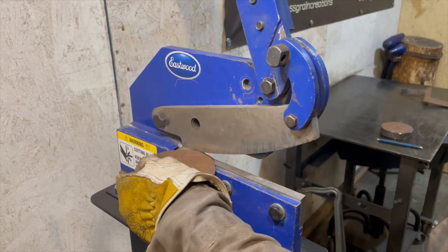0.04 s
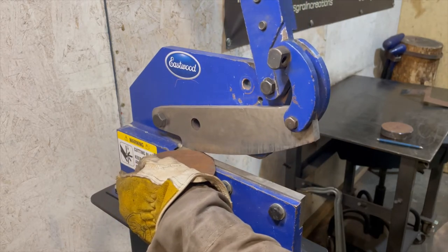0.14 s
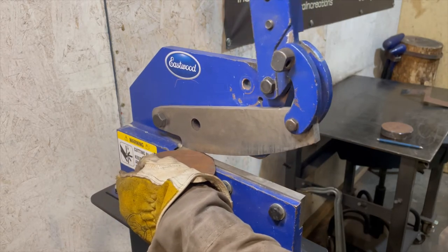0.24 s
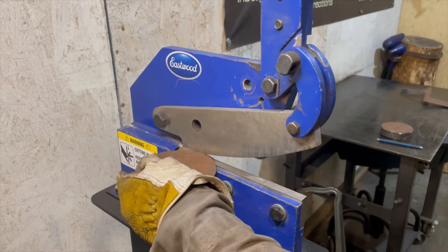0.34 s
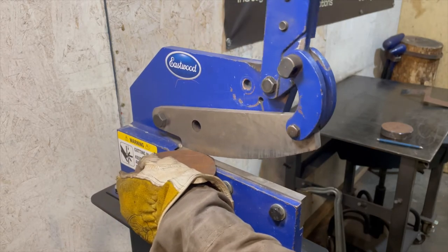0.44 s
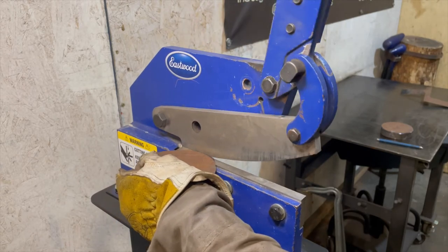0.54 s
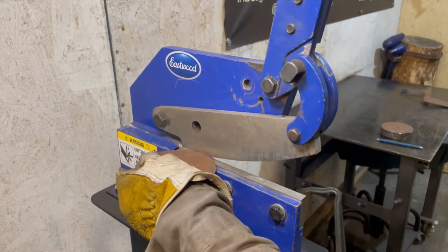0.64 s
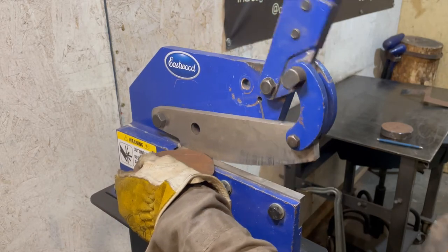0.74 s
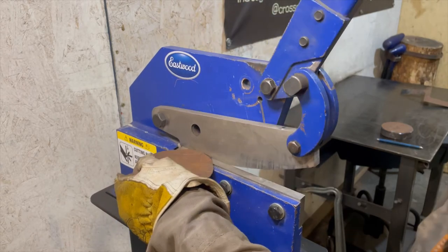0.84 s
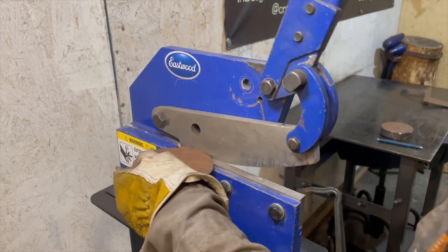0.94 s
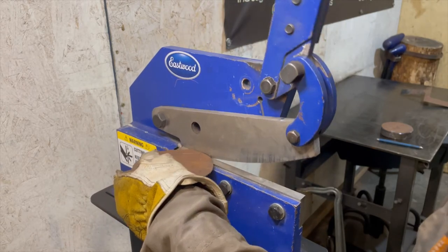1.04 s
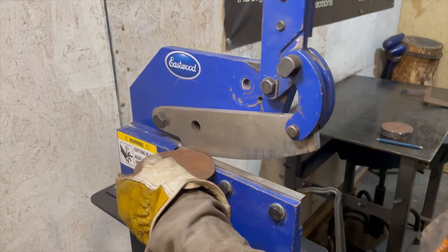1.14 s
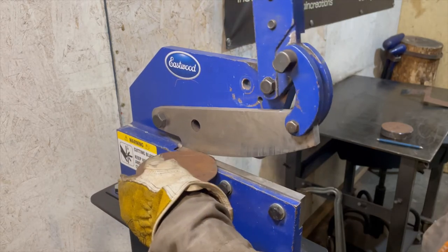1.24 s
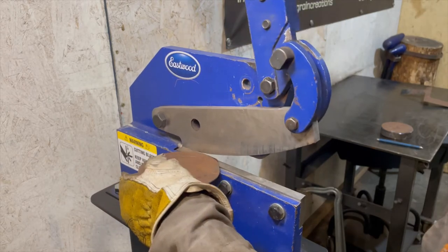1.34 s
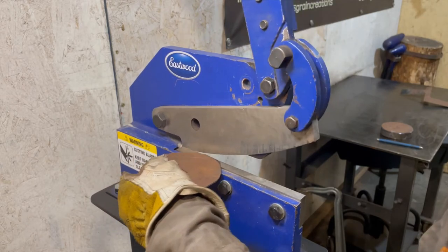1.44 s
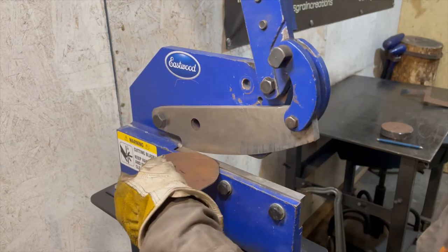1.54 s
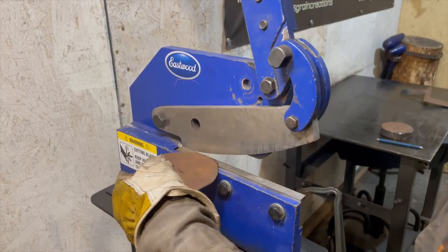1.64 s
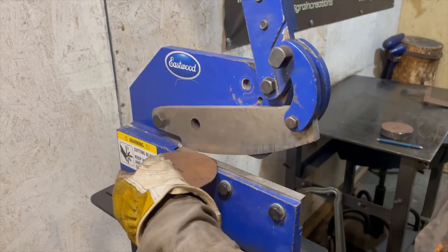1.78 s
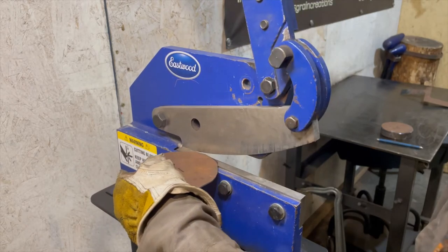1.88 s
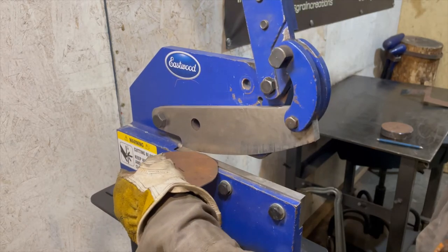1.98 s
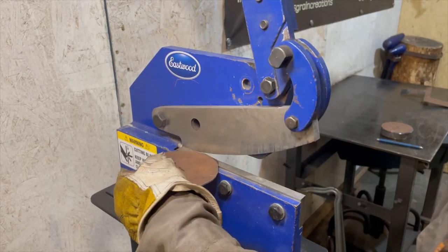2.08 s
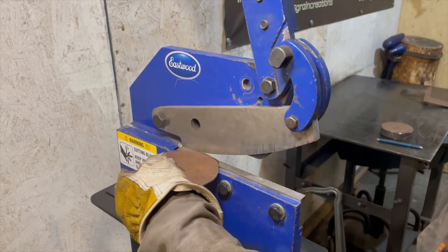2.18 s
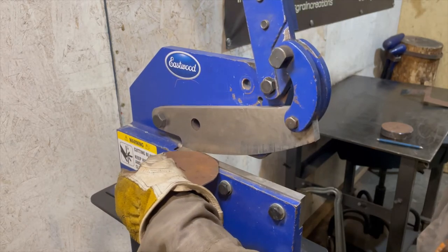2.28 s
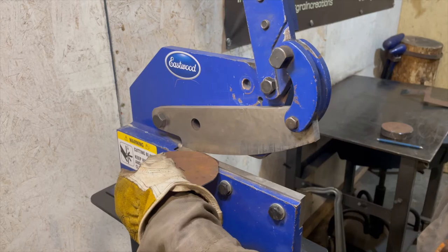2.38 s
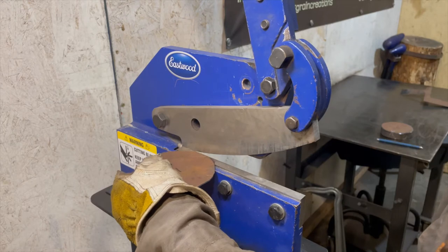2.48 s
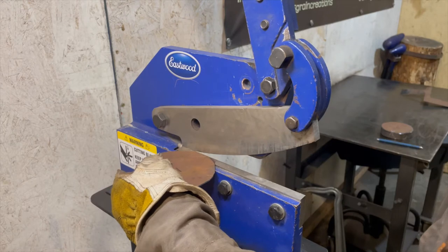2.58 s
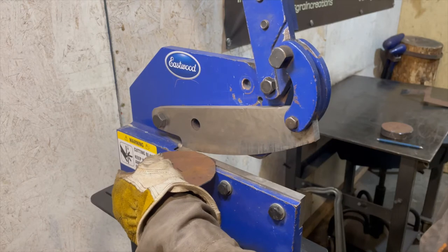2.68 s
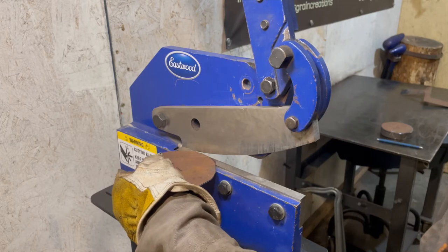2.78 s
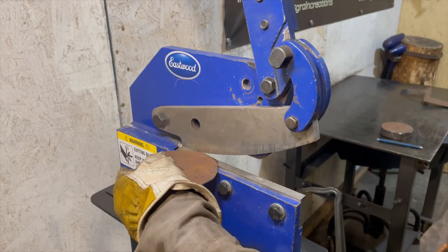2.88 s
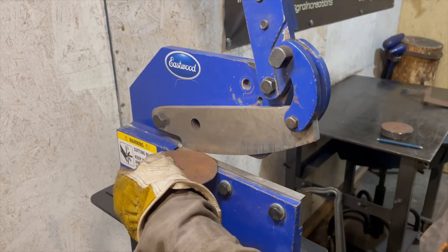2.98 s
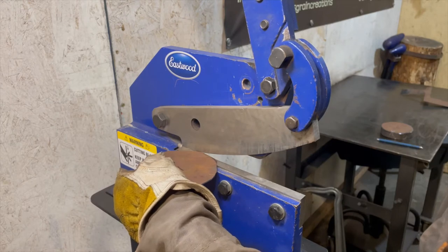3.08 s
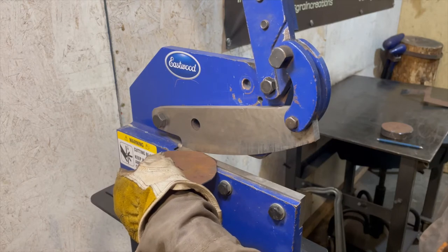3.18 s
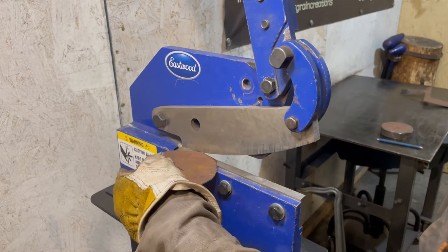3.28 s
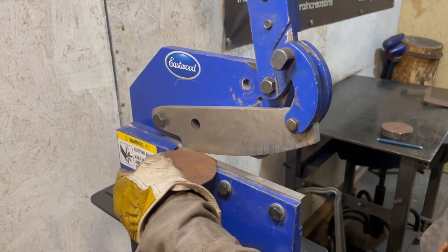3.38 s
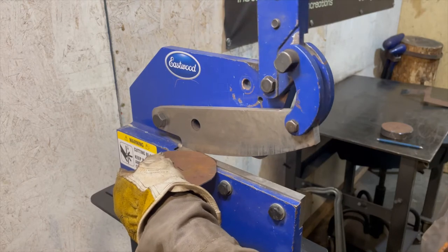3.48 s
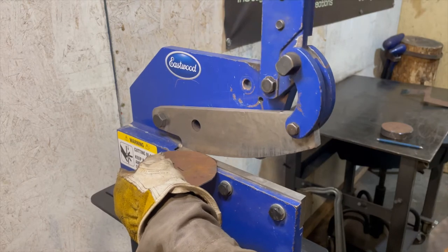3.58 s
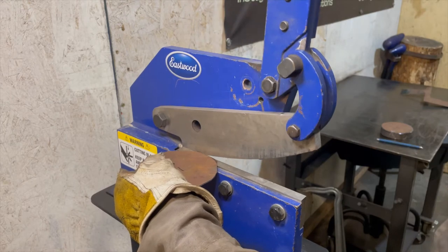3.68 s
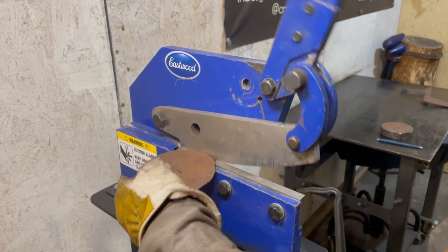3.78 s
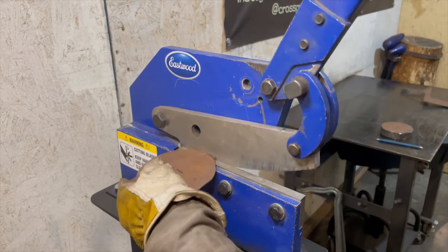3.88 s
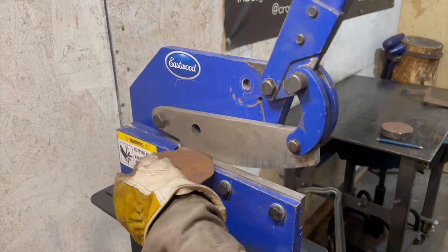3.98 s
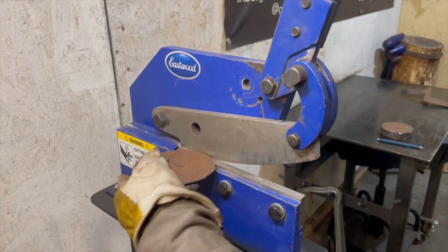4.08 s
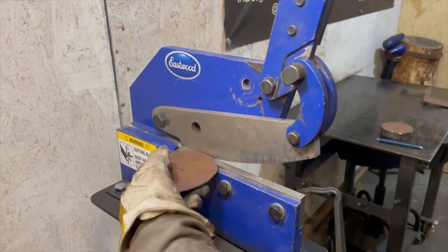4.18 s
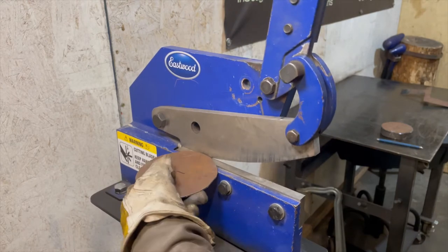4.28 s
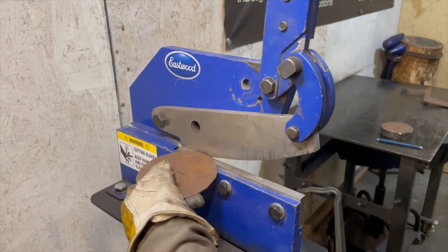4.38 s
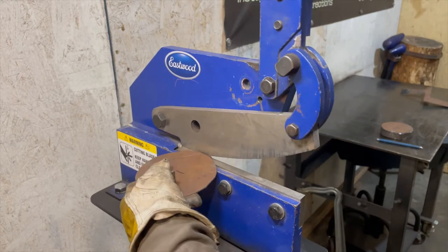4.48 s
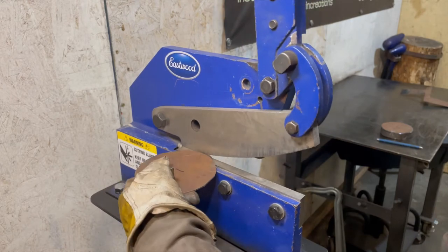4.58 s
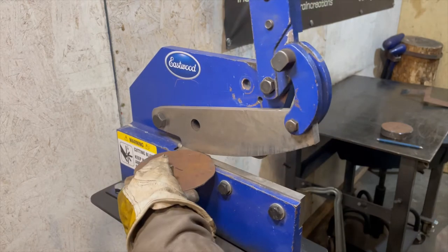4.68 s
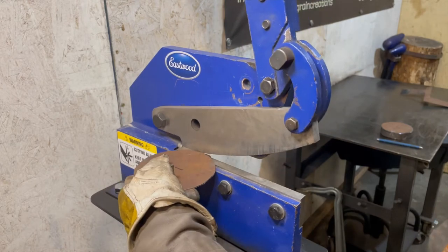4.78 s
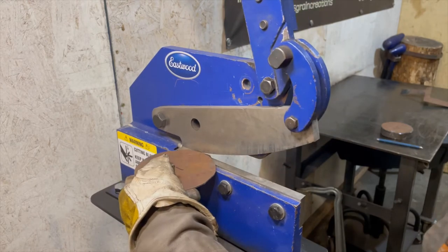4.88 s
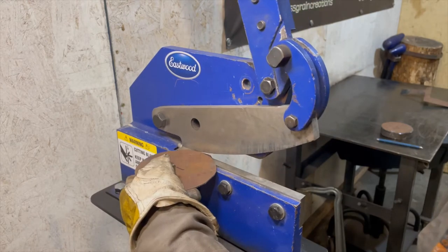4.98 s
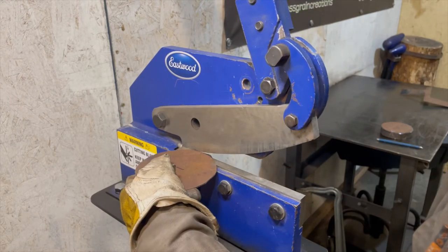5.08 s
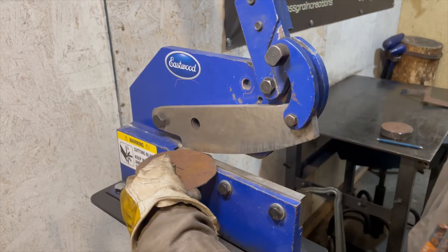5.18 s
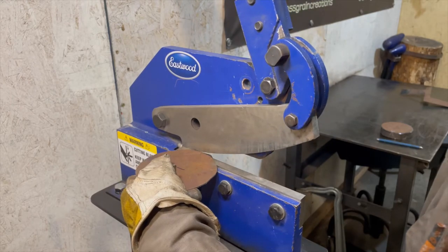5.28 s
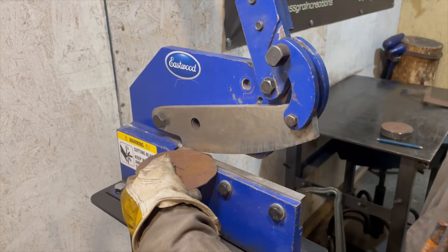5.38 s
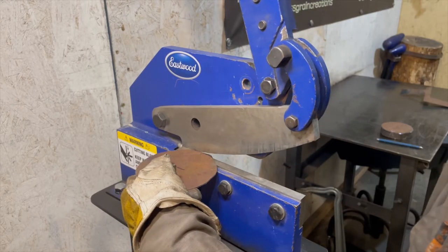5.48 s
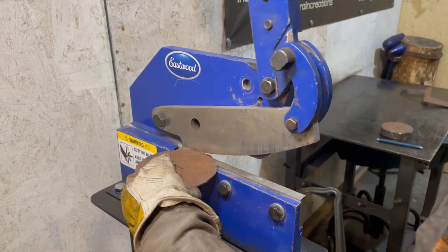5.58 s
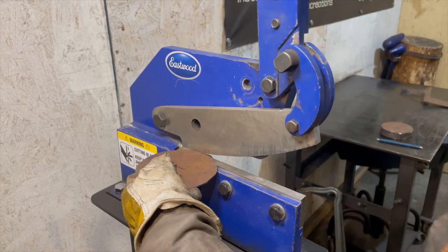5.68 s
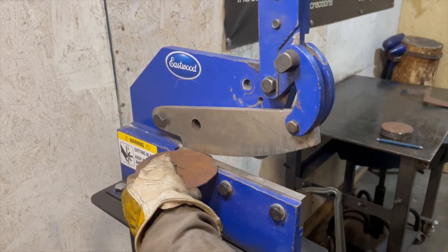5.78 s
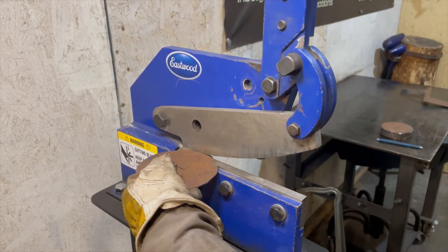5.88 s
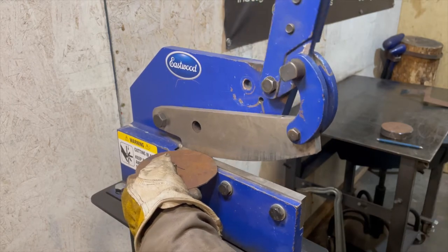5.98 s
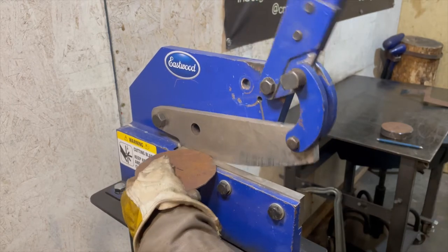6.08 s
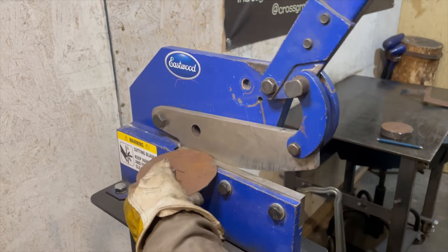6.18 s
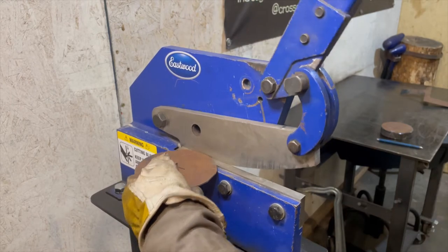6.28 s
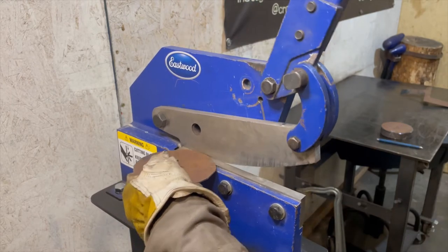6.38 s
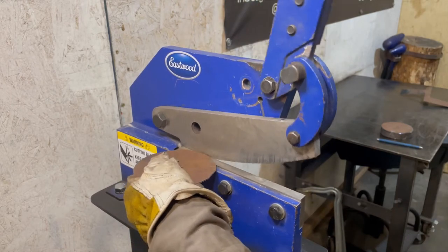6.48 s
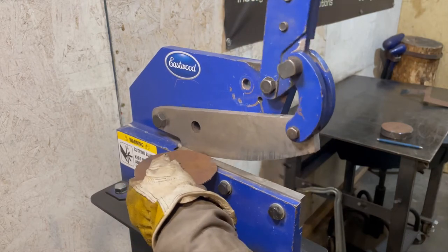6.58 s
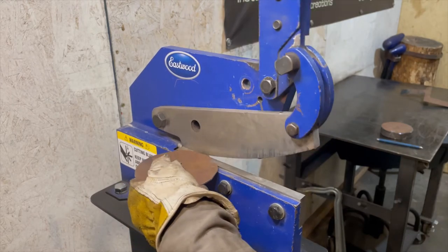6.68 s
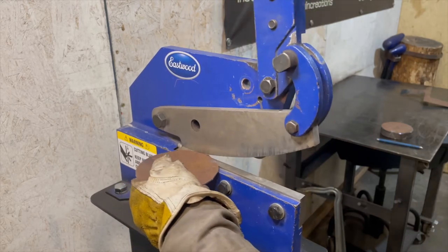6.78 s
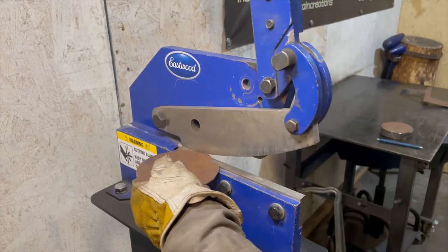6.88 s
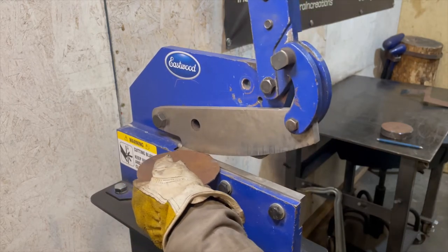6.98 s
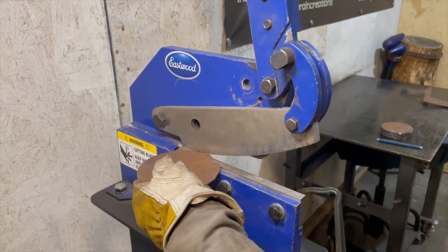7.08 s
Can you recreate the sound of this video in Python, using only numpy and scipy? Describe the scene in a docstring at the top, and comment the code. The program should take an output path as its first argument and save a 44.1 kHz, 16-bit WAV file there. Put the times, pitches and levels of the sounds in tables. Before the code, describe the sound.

A steel disc is cut by a hand-operated shear: grinding strain, explosive snap, bright clank and disc clinks, heard three times. After the first bite the disc is repeatedly slid and tapped into place; after the second it clinks brightly, then goes nearly quiet. Close microphone, hard workshop room, low table thumps and a very faint motor-like drone behind.

```python
"""A bench lever shear bites three times into a hand-held steel disc: the steel strains and snaps, the linkage
clanks and the frame rings on its table, as struck modes over dying noise. Between cuts the disc is tapped (damped
modes) and slid along the blade (grit through resonances). Behind lie a workshop hush, hum and drone, a swinging
table, floor bumps, soft tocks and a hiss. A room tail follows the metal and a limiter holds down the peaks."""
import sys
import numpy as np
from scipy import signal
from scipy.fft import rfft, irfft, next_fast_len
from scipy.io import wavfile
from scipy.ndimage import uniform_filter1d, minimum_filter1d, map_coordinates

SR = 44100
rng = np.random.default_rng(int(sys.argv[2]) if len(sys.argv) > 2 else 0)


def natural_amplitude(level_db):
    """Convert a level in decibels to a linear amplitude factor, elementwise."""
    exponent = np.asarray(level_db, float) / 20
    return 10 ** exponent


def transcribe(u):
    """Save the signal u as a 16-bit wav file named by the first command-line argument.

    u: samples, shape (n,) or (channels, n), limited to [-1, 1]; the rate is SR.
    q: integer samples, one column per channel.
    """
    v = np.clip(np.atleast_2d(u).T, -1, 1)
    q = np.round(v * 32767).astype(np.int16)
    wavfile.write(sys.argv[1], SR, q)


N = 314874  # length [samples]


def unit(x):
    """Scaled to rms 1."""
    return x / np.sqrt(np.mean(x ** 2) + 1e-20)


def along(points, hz):
    """Reads a curve of (frequency [Hz], value) points on a log frequency axis."""
    f, v = np.transpose(points)
    return np.interp(np.log(hz + 1), np.log(f + 1), v)


def wobble(rate):
    """A smooth random curve, rate knots a second."""
    return map_coordinates(rng.standard_normal(int(N * rate / SR) + 4), [np.arange(N) * rate / SR])


def unsteady(count, length, rate):
    """One wandering curve per mode, rate knots a second, joined by straight lines."""
    knots = rng.standard_normal((count, int(length * rate / SR) + 2))
    at = np.arange(length) * rate / SR
    return np.array([np.interp(at, np.arange(len(k)), k) for k in knots])


def filtered(x, response):
    """x times a complex response of frequency."""
    m = next_fast_len(N + SR // 2)
    return irfft(rfft(x, m) * response(np.fft.rfftfreq(m, 1 / SR)), m)[:N]


def resonances(modes, widen):
    """Causal response of modes (frequency [Hz], level [dB], t60 [s]), damped widen times more."""
    f = np.arange(SR // 4 + 1) * 2
    h = np.zeros(len(f), complex)
    for k, (hz, db, t60) in enumerate(modes):
        damping = 1j * f * widen * np.log(1000) / (np.pi * t60)
        h += (-1) ** k * natural_amplitude(db) * damping / (hz * hz - f * f + damping)
    return lambda hz: np.interp(hz, f, h)


def dying(gain, t60, length):
    """Noise whose every frequency dies at its own speed."""
    hz, t, z = signal.stft(rng.standard_normal(length), SR, nperseg=256)
    decay = natural_amplitude(-60 * t / t60(hz)[:, None])
    return signal.istft(z * gain(hz)[:, None] * decay, SR, nperseg=256)[1][:length]


def swell(s, db, rise, fall):
    """A gain that climbs to db at s seconds and sinks again, at steady dB per second."""
    t = np.arange(N) / SR - s
    return natural_amplitude(db + np.where(t < 0, rise * t, -fall * t))


def add(track, s, sound):
    """Mixes a sound in at s seconds."""
    part = track[round(s * SR):][:len(sound)]
    part += sound[:len(part)]


# workshop hush: (frequency [Hz], relative level per Hz [dB])
HUSH_TONE = [(20, -24), (34, 5), (49, -12), (80, -17.5), (241, -24.5), (281, -23), (354, -21), (392, -23.5),
             (535, -21.5), (578, -25), (1420, -32.5), (1940, -38.5), (3780, -39), (4770, -45.5),
             (16000, -63.5)]
# faint tones: (frequency [Hz], level [dB rms, before wavering])
HUM_TONES = [(530, -76.5), (763, -82.5), (1415, -88)]
HUSH_DB = -63  # rms
THROB_HZ, THROB_DB = 27, -61.5  # rms before wavering


def air():
    """Shaped noise for the hush, with sines that waver in level and phase for the throb and hum."""
    t = np.arange(N) / SR

    def tone(hz, db, drift):
        level = natural_amplitude(db + 1.5 * wobble(4)) * np.sqrt(2)
        return level * np.sin(2 * np.pi * hz * t + drift * wobble(6))

    hush = unit(filtered(rng.standard_normal(N), lambda f: natural_amplitude(along(HUSH_TONE, f))))
    hum = sum(tone(hz, db, drift=0.72) for hz, db in HUM_TONES)
    return natural_amplitude(HUSH_DB) * hush + tone(THROB_HZ, THROB_DB, drift=0.7) + hum


# low drone, perhaps a distant motor: (multiple of the base, level [dB rms])
DRONE_HARMONICS = [(1, -73.5), (2, -69), (3, -75.5), (4, -82), (5, -80.5), (6, -77.5), (7, -82), (8, -80.5),
                   (9, -81.5)]
DRONE_HZ, DRONE_WIDTH_HZ = 38.92, 3


def drone():
    """Narrow noise bands on the harmonics of one base share a slow swell."""
    def comb(f):
        return sum(natural_amplitude(db) * np.exp(-((f - DRONE_HZ * k) / DRONE_WIDTH_HZ) ** 2) for k, db in DRONE_HARMONICS)

    total = np.linalg.norm(natural_amplitude(np.transpose(DRONE_HARMONICS)[1]))
    return total * unit(natural_amplitude(3 * wobble(2.5)) * filtered(rng.standard_normal(N), comb))


# the floor heaves as weight shifts: (time [s], peak level [dB])
FLOOR_BUMPS = [(0.35, -53), (1.15, -50), (3.72, -49.5), (4.25, -46), (6.03, -49)]
BUMP_HZ, BUMP_DB_PER_S = 13, 70.5


def bumps():
    """Slow, barely audible heaves: a wandering low sine under swells."""
    heave = np.sin(2 * np.pi * BUMP_HZ * np.arange(N) / SR + wobble(5.5))
    return heave * sum(swell(s, db, BUMP_DB_PER_S, BUMP_DB_PER_S) for s, db in FLOOR_BUMPS)


# reverberation of the workshop: (frequency [Hz], t60 [s])
ROOM_T60 = [(150, 0.4), (1000, 0.89), (5000, 0.62), (12000, 0.53)]


def shop(x):
    """The room's tail is dying noise, drawn anew for every quarter second of sound, 12 ms late."""
    out, step = np.zeros(N), SR // 4
    for start in range(0, N, step):
        tail = dying(lambda f: 1 + 0 * f, lambda f: along(ROOM_T60, f), 3 * SR // 4)
        add(out, start / SR + 0.012, signal.fftconvolve(x[start:start + step], tail / np.linalg.norm(tail)))
    return out


# swells of hiss: (peak time [s], level [dB], rise [dB/s], fall [dB/s])
HISS_SWELLS = [(2.5, -79, 41, 18), (4.5, -66.5, 88.5, 21), (6.7, -72, 19.5, 6.5)]
# its colour: (frequency [Hz], relative level per Hz [dB])
HISS_COLOUR = [(880, -33), (1500, -4), (2020, -7.5), (2250, -4), (3370, -12), (4980, -9), (9000, -32),
               (11700, -65.5), (19800, -120)]


def hiss():
    """Soft, patchy shaped noise, perhaps glove and sleeve shifting."""
    noise = filtered(rng.standard_normal(N), lambda f: natural_amplitude(along(HISS_COLOUR, f)))
    return sum(swell(*row) for row in HISS_SWELLS) * natural_amplitude(1.2 * wobble(7.4)) * unit(noise)


# the table swings under pull, snap and release:
# (peak time [s], level [dB], rise [dB/s], fall [dB/s], frequency [Hz])
TABLE_SWINGS = [(0.29, -47.5, 170, 107, 59), (0.45, -52.5, 200, 107, 61), (0.69, -46, 302.5, 38, 62),
                (0.9, -49.5, 98.5, 284, 65), (1.17, -51.5, 118.5, 280, 60), (3.48, -53, 140, 31, 62),
                (3.72, -45.5, 108.5, 35, 63), (4.2, -51.5, 25, 88, 65), (4.41, -54, 171.5, 278, 68),
                (5.71, -47.5, 102, 59, 62), (6.04, -42, 212, 110, 62), (6.24, -40, 150.5, 300, 65.5),
                (6.38, -51.5, 253, 380, 60.5)]


def table():
    """The table's lowest mode swings while the lever is loaded: low sines with wandering phase."""
    t, swings = np.arange(N) / SR, np.zeros(N)
    for *shape, hz in TABLE_SWINGS:
        swings += swell(*shape) * np.sin(2 * np.pi * hz * t + 1.2 * wobble(7))
    return natural_amplitude(1.4 * wobble(21)) * np.sqrt(2) * swings


# soft hollow tocks as the disc settles: (time [s], level [dB])
SOFT_TOCKS = [(1.71, -61), (1.82, -63), (2.06, -54), (2.57, -57.5)]
TOCK_HZ, TOCK_T60_S, TOCK_RISE_S = 565, 0.25, 0.0039


def tocks():
    """One hollow mode, softly struck."""
    t, out = np.arange(SR // 4) / SR, np.zeros(N)
    ring = natural_amplitude(-60 * t / TOCK_T60_S) * (1 - np.exp(-t / TOCK_RISE_S)) * np.sin(2 * np.pi * TOCK_HZ * t)
    for s, db in SOFT_TOCKS:
        add(out, s, natural_amplitude(db) * ring)
    return out


# mode frequencies of the disc: (frequency [Hz])
DISC_MODE_HZ = [1040, 1650, 1990, 2492, 3300, 4350, 4690, 5760, 6440, 7200, 7671, 8979, 10070, 10680, 11680,
                13520, 14390]
# the same modes: (level gripped [dB], level held loosely [dB], t60 when free [s])
DISC_MODES = [(4.5, -2.5, 0.16), (-7, -34, 0.044), (-6.5, -35.5, 0.3), (-14.5, -10, 0.5), (-5, -24.5, 0.12),
              (-5, -3, 0.21), (-0.5, -5.5, 0.23), (-10, -8.5, 0.13), (-6, -3.5, 0.36), (-14, -16.5, .33),
              (-24, -35.5, 0.263), (-21.5, -25, .2), (-23.5, -25, .3), (-26, -18, 0.18),
              (-32.5, -19.5, 0.0867), (-29.5, -23, 0.18), (-28.5, -24, 0.11)]


def gripped_disc():
    """Response of the disc with its modes damped ninefold by the grip."""
    return resonances([(hz, row[0], row[2]) for hz, row in zip(DISC_MODE_HZ, DISC_MODES)], widen=9)


def knocked_frame(x):
    """Passes what the disc does to the steel through the frame's modes, as struck at the lever's stop."""
    modes = [(hz, row[3], row[4]) for hz, row in zip(FRAME_MODE_HZ, FRAME_MODES)]
    return natural_amplitude(11.5) * filtered(x, resonances(modes, widen=2.2))


# the disc slides along the blade: (start [s], level [dB], frame level [dB], length [s])
DISC_SLIDES = [(1.189, -48, 4, 0.029), (1.351, -47.5, -3, 0.081), (1.399, -49.5, -5, 0.047),
               (1.5, -60, 6.5, 0.033), (1.647, -55.5, -2.5, 0.07), (1.788, -54.5, -10, 0.057),
               (2.0025, -49.5, -0.5, 0.051), (2.081, -66, 5.5, 0.045), (2.324, -50.5, 4.5, 0.089),
               (2.752, -53, 5, 0.065), (2.955, -60.5, 1.5, 0.032)]


def slides():
    """Grit rubs in short strokes, heard through the gripped disc and through the frame."""
    t, (rub, drag) = np.arange(SR // 3) / SR, np.zeros((2, N))
    for s, db, frame_db, length in DISC_SLIDES:
        stroke = np.sin(np.pi * np.clip(t / length, 0, 1)) ** 1.4
        add(rub, s, natural_amplitude(db - 6.5) * stroke)
        add(drag, s, natural_amplitude(db + frame_db - 3.5) * stroke)
    grit = rng.standard_normal((2, N)) * natural_amplitude(3.6 * wobble(250))
    return rub * unit(filtered(grit[0], gripped_disc())) + knocked_frame(drag * grit[1])


# taps of the disc on steel:
# (time [s], level [dB], bass [dB], share of free ring time left by the glove, tick level [dB])
DISC_TAPS = [(0.987, -30.5, -2.5, 0.36, 1), (1.0744, -22, -3, 0.27, -5), (1.286, -44.5, 1, 0.22, 3.5),
             (1.837, -62, 1.5, 0.14, 6), (2.0381, -46, 1.5, 0.11, -2.5), (2.371, -51.5, 7.5, 0.28, -8.5),
             (2.3776, -38.5, -3.5, 0.077, -16), (2.3989, -26.5, -5.5, 0.094, -4.5),
             (2.5555, -49.5, 1.5, 0.092, 0), (2.801, -47, -0.5, 0.18, -4),
             (3.9753, -23.5, -11.5, 0.21, 9.5), (4.1594, -32.5, 8, 0.36, -12),
             (4.1761, -17.5, -5, 0.32, -4), (4.2934, -32.5, 1.5, 0.22, -3),
             (4.434, -48.5, 7.5, 0.066, 14.5), (4.7186, -59.5, 8.5, 0.14, 5), (5.0426, -60, 1, 0.12, 1),
             (5.2508, -64, 2, 0.08, 5.5), (5.3205, -66, 1.5, 0.08, 5.5), (5.3546, -68, 5.5, 0.08, 4),
             (5.4714, -57.5, 2.5, 0.087, 5), (5.5164, -57, -3.5, 0.08, 4.5), (6.264, -29, -8, 0.044, -0.5),
             (6.3317, -45.5, 6, 0.13, 10), (6.3722, -30.5, 1.5, 0.11, -1), (6.6495, -56.5, -2, 0.17, 6.5),
             (6.6856, -57, 9, 0.14, -0.5), (6.7894, -55, 0, 0.13, 1.5)]
# when the disc is held loosely: (from [s], to [s])
LOOSE_SPAN = (4.1, 4.32)
# a freer disc is brighter, a stronger tick duller
TAP_TREBLE_DB, TREBLE_PER_FREE_DB, TREBLE_PER_TICK = -33, 21, -0.3
RATTLE_DB, RATTLE_T60_S, RATTLE_TOP_DB = -29.5, 0.14, -8.5


def taps():
    """Taps tick, ring the disc's modes as long as the glove lets them, and knock the frame."""
    hz, (gripped_db, loose_db, t60) = np.array(DISC_MODE_HZ), np.transpose(DISC_MODES)
    t, (out, knocks) = np.arange(SR // 3) / SR, np.zeros((2, N))
    gripped = gripped_disc()
    # split pairs and a shifting grip blur each mode
    shiver = np.exp(1.3j * unsteady(count=len(hz), length=len(t), rate=84))
    for s, db, bass_db, free, tick_db in DISC_TAPS:
        treble_db = TAP_TREBLE_DB + TREBLE_PER_FREE_DB * free + TREBLE_PER_TICK * tick_db

        def tilt(f):
            return along([(1300, bass_db + 4), (2200, 0.0033), (7000, 0.0066), (9000, treble_db + 21)], f)

        def tick_colour(f):
            slope = along([(1300, bass_db + 4.5), (2500, 0.004), (9000, treble_db + 5.5)], f)
            return natural_amplitude(slope) * (f > 600) * (0.6 + 0.91 * abs(gripped(f)))

        def rattle_colour(f):
            return natural_amplitude(tilt(f) + along([(1200, -29), (2000, -0.5), (6000, 2.5), (15000, RATTLE_TOP_DB)], f))

        # a firm grip smears the modes more
        if LOOSE_SPAN[0] < s < LOOSE_SPAN[1]:
            mode_db, free, blur = loose_db, 1.5 * free, shiver ** 1.7
        else:
            mode_db, blur = gripped_db, shiver ** 3
        level = natural_amplitude(mode_db + tilt(hz) + rng.normal(0, 1.5, len(hz))) * rng.choice([-1, 1], len(hz))
        modes = np.exp(np.outer(2j * np.pi * hz - np.log(1000) / (free * t60), t))
        ring = level @ (modes * blur).imag
        add(out, s, natural_amplitude(db) * np.sqrt(free) * ring * (1 - np.exp(-t / 0.00059)))
        tick = dying(tick_colour, lambda f: 0.02 + 0 * f, SR // 20)
        add(out, s, natural_amplitude(db + tick_db + 4) * tick)
        # countless small disc modes fill the gaps between the clear ones
        rattle = unit(dying(rattle_colour, lambda f: RATTLE_T60_S + 0 * f, SR // 4))
        add(out, s, natural_amplitude(db + RATTLE_DB) * np.sqrt(free) * rattle)
        add(knocks, s, natural_amplitude(db + bass_db + 7) * tick)
    return out + knocked_frame(knocks)


# surges of strain under the blade:
# (peak time [s], grind level [dB], rise [dB/s], fall [dB/s], groan over grind [dB])
STRAIN_SURGES = [(0.157, -58, 270, 61.5, 5), (0.217, -49.5, 528, 209, 3.5), (0.41, -54.5, 116, 116, 5.5),
                 (0.675, -36, 852, 35.5, -1), (3.349, -71.5, 1404, 43, 5), (3.418, -61.5, 181, 100.5, 15.5),
                 (3.67, -55, 231.5, 32.5, 7.5), (5.562, -45, 296.5, 605.5, -11.5),
                 (5.58, -63.5, 301.5, 118, 0.5), (5.9, -52, 233, 8, 6)]
# the steel gives way: (time [s])
SNAP_TIMES = [0.678, 3.677, 5.992]
# colours of grind and groan ahead of the frame: (frequency [Hz], relative level per Hz [dB])
GRIND_TONE = [(710, -24), (1200, -2), (1410, -12.5), (1950, -11), (3600, -14), (4050, -25), (4840, -14.5),
              (6580, -27.5), (15000, -56)]
GROAN_TONE = [(59, -43), (100, -8), (274, -15.5), (327, -2.5), (570, -6), (647, -25.5), (855, 0.5),
              (949, -13.5), (1210, -7), (1600, -36), (2080, -60), (3520, -120)]


def strain():
    """The cut grinds in fine slips that feed the frame's modes; the loaded frame groans below."""
    t, (grind, groan) = np.arange(N) / SR, np.zeros((2, N))
    for s, db, rise, fall, groan_db in STRAIN_SURGES:
        snap = min(snap for snap in SNAP_TIMES if snap > s - 0.1)
        surge = swell(s, db, rise, fall) * (t < snap)  # the snap ends the strain
        grind += surge
        groan += natural_amplitude(groan_db) * surge
    body = resonances([(hz, 0, row[-1]) for hz, row in zip(FRAME_MODE_HZ, FRAME_MODES)], widen=0.74)
    slips = rng.standard_normal((2, N)) * natural_amplitude(3 * wobble(200))

    def through_frame(x, tone):
        return unit(filtered(x, lambda f: natural_amplitude(along(tone, f)) * (0.29 + body(f))))

    return grind * through_frame(slips[0], GRIND_TONE) + groan * through_frame(slips[1], GROAN_TONE)


# blows on the shear: (time [s], level [dB], bass [dB], treble [dB], lasting ring [dB])
SHEAR_BLOWS = [(0.151, -38.5, -3, -11.5, -7), (0.21, -33.5, 2, -10.5, -7.5), (0.678, -20, -17, -16, -3),
               (0.683, -9, -8.5, -8, -1.5), (0.694, -17, -17.5, -12.5, 2), (1.004, -27.5, -19.5, -18.5, 4),
               (1.018, -37.5, 4.5, -21.5, -6.5), (3.345, -52, -13.5, -27.5, -6),
               (3.366, -44.5, -3.5, -23.5, -4), (3.395, -39.5, -4, -29, -8.5), (3.42, -45.5, 8.5, -38, -9),
               (3.609, -50.5, 1, -22, -5.5), (3.646, -46, -8.5, -25, -1.5), (3.677, -8, -17, -7.5, -4),
               (3.694, -8, -11, -8.5, 0.5), (3.701, -5.5, -19, -15, -12.5), (4.03, -17.5, -11, -27.5, 2),
               (4.326, -28.5, -13, -38, -0.5), (5.496, -45.5, 3, -23.5, -6.5),
               (5.532, -36, -12.5, -34.5, -2), (5.544, -38.5, -13.5, -30, 4.5), (5.579, -44.5, 2.5, -14, 6),
               (5.992, -22, -15.5, -15, -3), (6.005, -14.5, -22.5, -5.5, -3.5), (6.012, -9, -11, -4, -1.5),
               (6.265, -33.5, -13, -27.5, -0.5), (6.334, -41, -12.5, -16, -15.5),
               (6.705, -50, -4.5, -40.5, -1)]
# place struck, 0-2 along the blade, 3 the lever's stop: (from time [s], place)
STRUCK_PLACE = [(0, 0), (.95, 3), (2, 1), (3.95, 3), (5.2, 2), (6.2, 3)]
# mode frequencies of shear and table: (frequency [Hz])
FRAME_MODE_HZ = [140, 205, 325, 378, 598, 802, 872, 1046, 1100, 1140, 1197, 1254, 1290, 1337, 1545, 1715,
                 1915, 2060, 2184, 2340, 2525, 2620, 3052, 3233, 3268, 3302, 3519, 3773, 4445, 5610]
# the same modes: (level struck at place 0 [dB], at 1 [dB], at 2 [dB], at 3 [dB], t60 [s])
FRAME_MODES = [(-24, -12.5, -20.5, -25, 0.35), (-21.5, -22, -10.5, -15.5, 0.53),
               (1.5, -2.5, -2.5, -2, 0.23), (-15, -4, -18, -11, .35), (-10.5, -5, -21, -27, 0.11),
               (-10, -8.5, -14.5, -13, 1.1), (-7.5, -11.5, -17, -9, 0.89), (-10, -11.5, -13, -15.5, 0.8),
               (-3.5, -2, -8, -10, 0.56), (-2, -8.5, -19, -11, 0.99), (-18.5, -16, -7.5, -9, 0.57),
               (-13, -16, -9.5, -1.5, 1.13), (-1, -17.5, -13, -16, 0.33), (-14.5, -21.5, -20, -20.5, 1.2),
               (-18.5, -19, -17, -18.5, 0.5), (-16.5, -25.5, -20, -24, 0.42),
               (-23, -11.5, -29.5, -24.5, .5), (-23, -10, -11.5, -15, 0.47), (-15, -21, -18.5, -12, 0.24),
               (-21.5, -21, -24.5, -25.5, 1.3), (-10, -14, -23.5, -18, 0.36),
               (-16.5, -18.5, -13, -18, 0.38), (-0.5, -19.5, -10.5, -23, 0.36),
               (-20, -4.5, -20, -18.5, 0.3), (-30, -6, -23.5, -22.5, 0.46), (-29, -28, -19, -24, 0.37),
               (-6, -20.5, -10, -24.5, 0.15), (-17, -6, -13, -15, 0.28), (-18, -12, -13, -24, 0.19),
               (-16, -28.5, -20, -29.5, 0.17)]
# countless small modes: (frequency [Hz], relative level per Hz [dB])
CLATTER_TONE = [(24, -43.5), (40, -17), (256, -8), (345, -15.5), (663, -15.5), (852, 0), (942, -20),
                (1090, -3), (1410, -13.5), (2100, -12.5), (2840, -18), (3300, -12), (16000, -49)]
# their decay: (frequency [Hz], t60 [s])
CLATTER_DECAY = [(100, 0.46), (1000, 0.55), (4000, 0.32), (6000, 0.51), (8500, 0.044), (15000, 0.055)]
SNAP_RISE_MS, CLANK_RISE_MS = 0.6, 1.9  # the break is abrupt, other contacts seat more softly


def shear():
    """Each blow rings the frame's clear modes over a dense, crackling clatter, led by a short crack."""
    hz, (*place_db, t60) = np.array(FRAME_MODE_HZ), np.transpose(FRAME_MODES)
    since, place = np.transpose(STRUCK_PLACE)
    t, (rings, noise) = np.arange(5 * SR // 4) / SR, np.zeros((2, N))
    modes = np.exp(np.outer(2j * np.pi * hz - np.log(1000) / t60, t))
    # near neighbours cluster round a mode: its phase wanders, more so the higher it is
    modes *= np.exp(1j * (hz / 8000)[:, None] * unsteady(count=len(hz), length=len(t), rate=45))
    modes *= 1 + 0.7 * np.exp(-t / 0.016)  # loose joints eat the large early swings
    signs = (-1) ** np.arange(len(hz))  # neighbouring modes start in opposite directions
    for s, db, bass_db, treble_db, ring_db in SHEAR_BLOWS:
        def tilt(f):
            return along([(150, bass_db + 6.5), (350, bass_db + 13), (900, -0.3), (2200, 0.48),
                          (3600, 0.84), (7000, treble_db + 17)], f)

        def colour(f):
            return natural_amplitude(along(CLATTER_TONE, f) + tilt(f))

        at_snap = min(abs(s - snap) for snap in SNAP_TIMES) < 0.008
        rise = 1 - np.exp(-1000 * t / (SNAP_RISE_MS if at_snap else CLANK_RISE_MS))
        struck_db = place_db[int(place[since <= s][-1])]
        level = natural_amplitude(struck_db + tilt(hz) + rng.normal(0, 0.41, len(hz)))
        ring = ((level * signs) @ modes).imag
        clatter = natural_amplitude(14.5) * dying(colour, lambda f: along(CLATTER_DECAY, f), SR // 2)
        crack = dying(colour, lambda f: 0.072 + 0 * f, SR // 8)
        add(rings, s, natural_amplitude(db + ring_db - 12.5) * ring * rise)
        add(noise, s, natural_amplitude(db + ring_db - 10.5) * clatter * rise[:SR // 2])
        add(noise, s, natural_amplitude(db + 15) * crack * rise[:SR // 8])
    return rings + noise * natural_amplitude(1.1 * wobble(150))  # parts chatter against each other


def scene():
    """Shear, cut and disc with their room tail, over the background."""
    machine = shear() + strain()
    plate = taps() + slides() + tocks()
    room = shop(natural_amplitude(-11) * machine + natural_amplitude(-8.5) * plate)
    background = air() + drone() + bumps() + hiss() + table()
    return (machine + plate + room + background)[None]


def top_cut(x):
    """Nothing passes above the cut-off."""
    return signal.sosfilt(signal.butter(12, 16730, fs=SR, output="sos"), x)


def record(dry):
    """The band ends at 16 kHz, then a look-ahead limiter holds the snaps down."""
    x = filtered(dry[0], lambda f: f < 16000)
    needed = np.minimum(1, natural_amplitude(-8.2) / (abs(x) + 1e-9))
    gain = uniform_filter1d(minimum_filter1d(needed, size=176), size=88)  # 4 ms hold, 2 ms smoothing
    mix = (x * gain)[None]
    return top_cut(mix)


dry = scene()
out = record(dry)
transcribe(out)
```